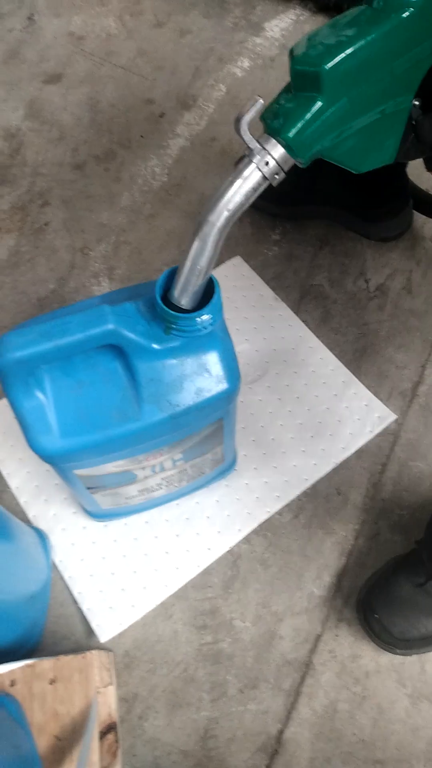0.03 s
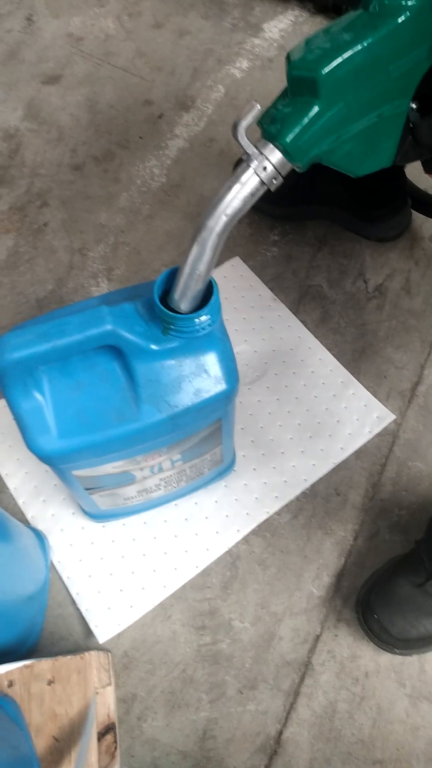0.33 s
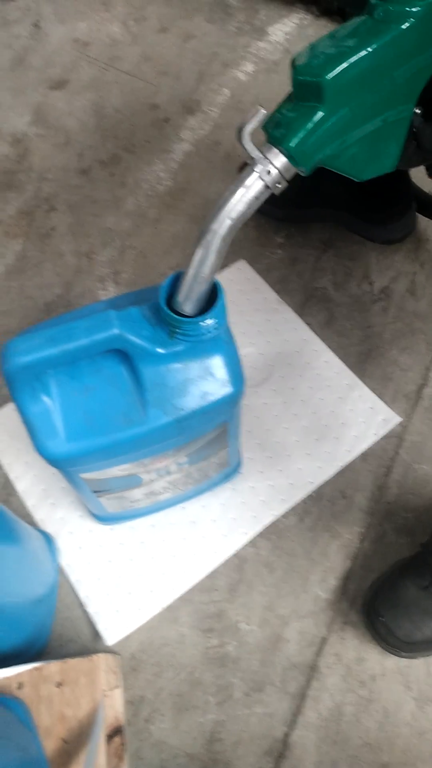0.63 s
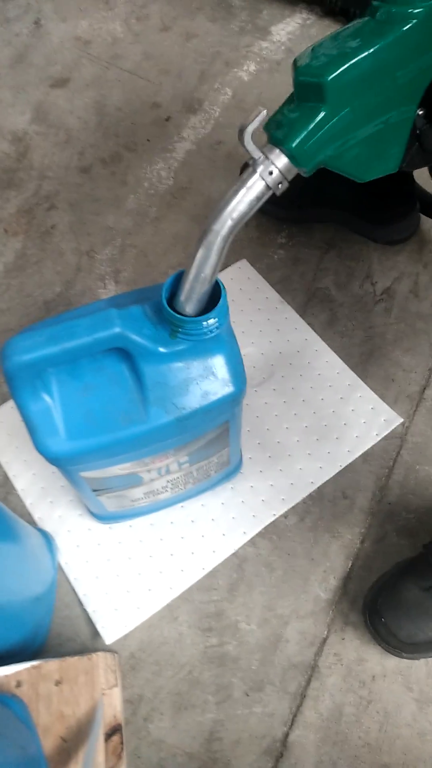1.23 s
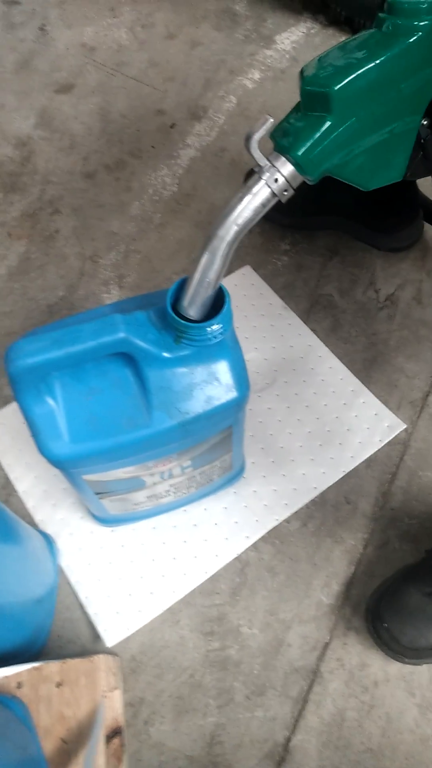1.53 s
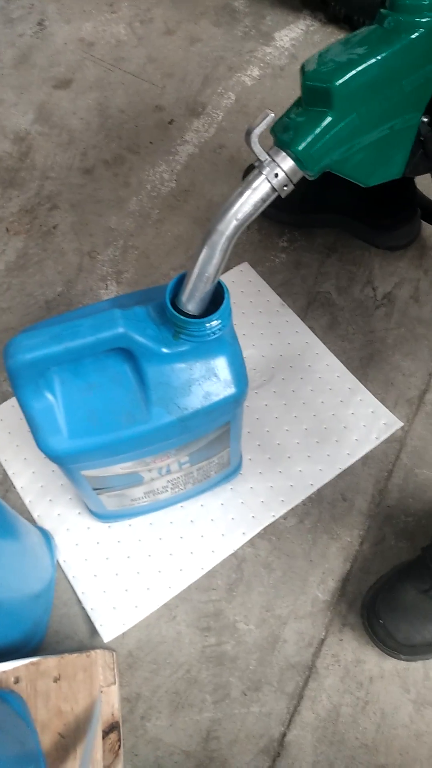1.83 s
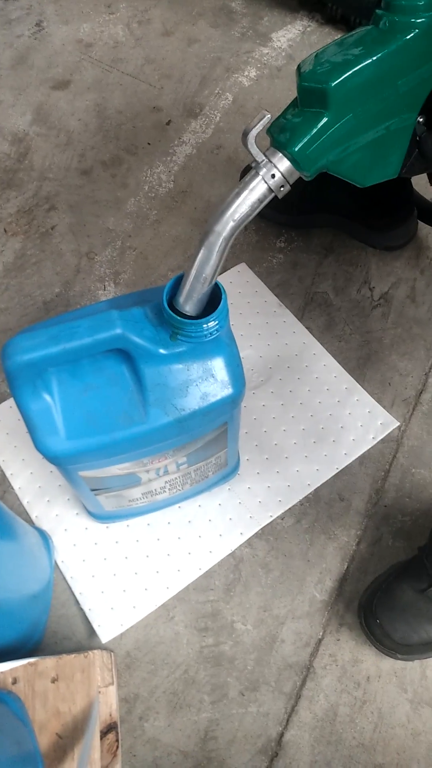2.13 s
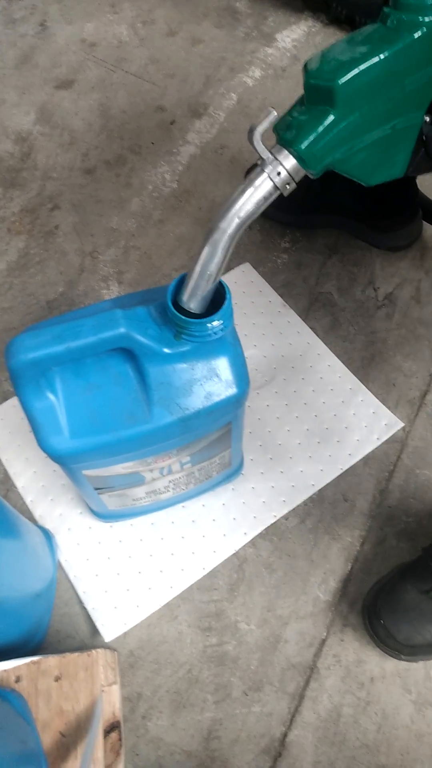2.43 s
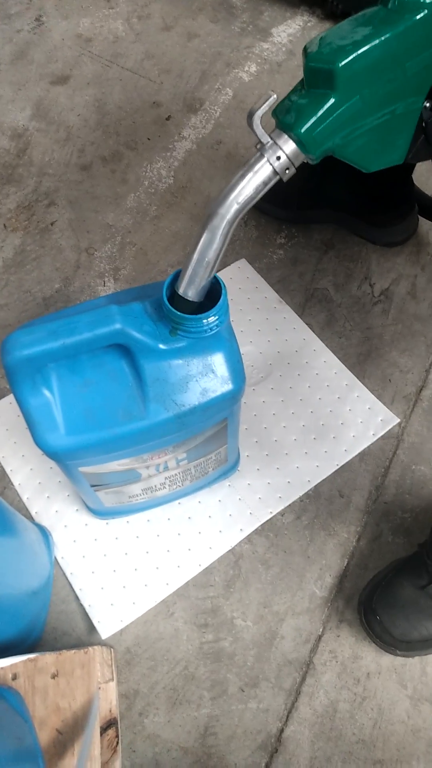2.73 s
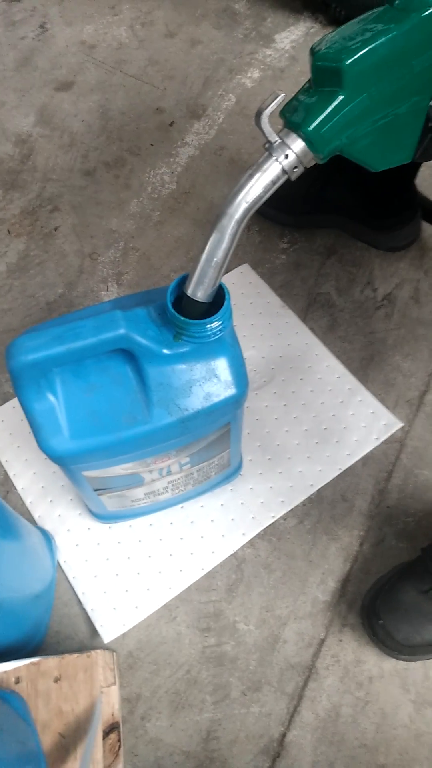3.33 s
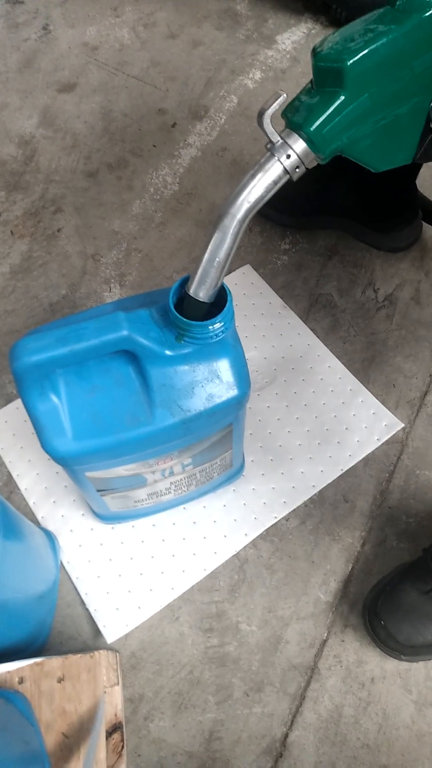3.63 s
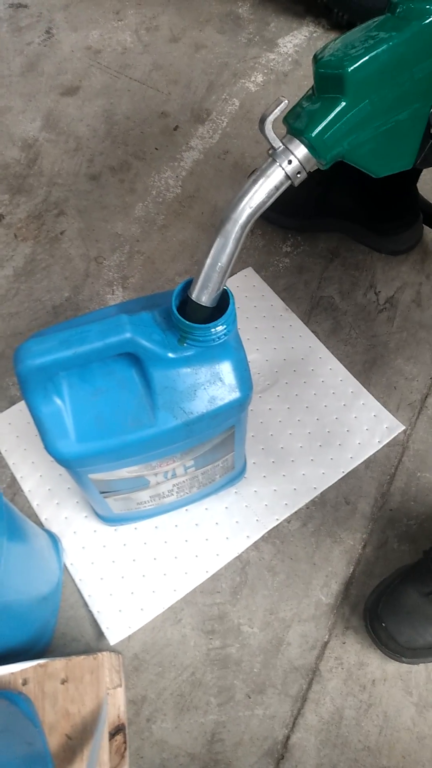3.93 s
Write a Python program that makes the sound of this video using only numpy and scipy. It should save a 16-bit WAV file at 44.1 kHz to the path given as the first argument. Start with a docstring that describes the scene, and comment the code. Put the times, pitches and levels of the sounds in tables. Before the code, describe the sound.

An air-driven oil pump lets out four sharp puffs of exhaust, each with a small valve squeak and clack. Leaking air hisses and whistles thinly between them, over a steady machine hum in a slightly echoing workshop.

```python
"""A workshop machine hums and throbs under the hiss and thin, high whistle of an air-driven oil pump.
Air leaks through the pump's passages on every piston stroke, and the whistle climbs with the pressure:
bright on the way up, lower and faint on the way down. At each of four turns the air valve squeaks,
clacks over and lets out a puff of exhaust, hiss on top of a low gust, that the room carries on."""
import sys
import numpy as np
from scipy import signal
from scipy.fft import rfft, irfft
from scipy.io import wavfile

SR = 44100
rng = np.random.default_rng(int(sys.argv[2]) if len(sys.argv) > 2 else 0)


def log_audio(samples):
    """Write samples as a 16-bit WAV file to the path given in sys.argv[1]."""
    # one column per channel
    frames = np.atleast_2d(samples).T
    # limit to full scale, then quantise
    limited = np.clip(frames, -1, 1)
    pcm = np.round(limited * 32767).astype(np.int16)
    wavfile.write(sys.argv[1], SR, pcm)


N = 176400
T = np.arange(N) / SR
HZ = np.fft.rfftfreq(N, 1 / SR)

# machine hum partials: multiple of HUM_HZ, level/dB relative to HUM_DB
HUM_PARTIALS = [(2, -7.5), (3, -0.5), (4, -1), (5, -1.5), (6, 1)]
HUM_HZ, HUM_DB, HUM_WAVER_DB, HUM_DRIFT_HZ, THROB_DEPTH = 37.02, -47.5, 3, 0.26, 0.35
# steady motor tones: f/Hz, level/dB
MOTOR_TONES = [(333.8, -51.5), (362, -58), (729, -67.5)]
# workshop rumble bed: f/Hz, level/dB per Hz
RUMBLE_SPECTRUM = [(20, -86), (35, -86), (55, -97), (75, -69.5), (105, -63), (170, -63.5), (245, -60.5),
                   (310, -70), (500, -75), (750, -77.5), (1100, -79.5), (1500, -80.5), (1950, -83),
                   (2200, -91), (4000, -100), (16000, -115)]

UP_STARTS_S, DOWN_STARTS_S = [-0.497, 1.333, 3.175], [0.425, 2.255]
PRESSURE_FROM_S, PRESSURE_RISE_S, STROKE_S = 0.24, 0.21, 0.88
# broad hiss of the leak: f/Hz, level/dB per Hz
LEAK_SPECTRUM = [(1500, -103), (2300, -88.5), (3600, -91.5), (4400, -84), (6200, -87), (7900, -82.5),
                 (9200, -85.5), (10200, -93), (11500, -105), (12800, -94), (13600, -106), (16000, -112)]
# air passage resonances: f/Hz, width/Hz, upstroke level/dB per Hz, downstroke level/dB per Hz
PASSAGE_RESONANCES = [(2992, 100, -74.5, -81.5), (4240, 100, -87, -80), (4980, 96, -75, -79),
                      (5560, 140, -75.5, -73), (6810, 160, -76.5, -73.5), (7440, 180, -70.5, -74),
                      (7860, 190, -66, -72), (8300, 100, -71.5, -88), (8750, 335, -68.5, -76),
                      (12070, 220, -76, -81.5), (12600, 190, -79, -89)]
# bright upstroke whistle: t/s into the stroke, f/Hz, level/dB
UP_WHISTLE_CURVE = [(0.249, 9750, -47), (.3, 10300, -40), (0.349, 10760, -33), (.41, 10920, -34.5),
                    (0.551, 11070, -28.5), (0.702, 11310, -31.5), (.828, 11370, -36), (.842, 12560, -33),
                    (.853, 11900, -48), (0.864, 10000, -38), (0.891, 9100, -31)]
# faint downstroke whistle: t/s into the stroke, f/Hz, level/dB
DOWN_WHISTLE_CURVE = [(.29, 5300, -51), (.35, 5660, -51.5), (.4, 5860, -51.5), (.51, 6060, -57),
                      (.7, 6220, -57), (.76, 6240, -48.5), (.825, 6310, -42), (.84, 6400, -55)]
FLUTTER_DB, JITTER_HZ, BREAK_S, BREAK_JITTER_HZ = 1.5, 30.8, 0.832, 330

# squeaks of the shifting valve: t/s, length/s, start f/Hz, top f/Hz, level/dB
VALVE_SQUEAKS = [(0.36, 0.024, 5420, 5600, -34), (.372, 0.011, 8100, 8150, -24),
                 (.406, 0.016, 5380, 5600, -26), (1.269, 0.016, 6500, 7870, -23.5),
                 (1.294, 0.02, 6980, 8900, -19.5), (2.199, 0.015, 7940, 8100, -22.5),
                 (2.228, 0.021, 5490, 5680, -27.5), (3.113, 0.016, 6500, 8000, -22.5),
                 (3.139, 0.02, 7200, 8950, -21)]
SQUEAK_PEAK_SHARE, SQUEAK_BEND, SQUEAK_JITTER_HZ = 0.82, 3.18, 160
# air slipping past the valve before it turns over: f/Hz, level/dB per Hz
SLIP_SPECTRUM = [(2500, -88), (4700, -76.5), (5600, -63.5), (6400, -72), (8000, -63.5), (9100, -72),
                 (10300, -90), (12800, -75), (14000, -88), (16000, -81)]
SLIP_LEAD_S, SLIP_SPUTTER_DB = 0.06, 3
# mix of each turn: t/s, hiss gain/dB, clack gain/dB, ping level/dB, gust gain/dB, thump gain/dB
TURNS = [(.425, 2, -3, -23.5, 0.5, -5.5), (1.333, 2, -1.5, -27, 1, -0.5), (2.255, 1.5, -2, -21, 0, -11),
         (3.174, 2, -12, -43, 1.5, 0)]
# hiss of the exhaust jet: f/Hz, level/dB per Hz
JET_SPECTRUM = [(500, -94), (1900, -72.5), (2230, -79.5), (2600, -72), (3000, -67), (3600, -65.5),
                (4400, -62.5), (5200, -64), (6200, -61), (7300, -59.5), (8700, -57), (10200, -62),
                (11800, -62.5), (13500, -61.5), (15500, -68)]
OPEN_S, HOLD_S, EMPTY_S, JET_SPUTTER_DB = 0.04, 0.071, 0.056, 1.07
# housing resonances that each puff rings: f/Hz, width/Hz, level/dB per Hz, fall/s
HOUSING_RINGS = [(1890, 56, -68, 0.22), (2830, 150, -71, 0.14)]
# metal modes of the air valve: f/Hz, level/dB, t60/s
VALVE_MODES = [(4680, -30, .03), (5440, -44, 0.024), (9050, -28, .05), (12500, -21, 0.042)]
CLACK_S, SPIT_DB, PING_HZ, PING_S = 0.0088, 4, 3090, 0.0034
# turbulent low body of the jet: f/Hz, level/dB per Hz
GUST_SPECTRUM = [(25, -82), (65, -67), (140, -56.5), (300, -64), (500, -61.5), (750, -63), (1200, -65.5),
                 (1900, -74.5), (2600, -70.5), (6000, -100)]
THUMP_AFTER_S, THUMP_WIDTH_S, THUMP_DB = 0.093, 0.0015, -15.5

# likeness of left and right in the rumble and the reverb: f/Hz, coherence/0-1
COHERENCE = [(60, 0.81), (120, 1), (220, 0.84), (350, 0.8), (500, 0.66), (750, 0.22), (1300, 0)]
# stereo balance of the pump: f/Hz, left minus right level/dB
BALANCE = [(300, -1), (700, 0.7), (1300, -5), (2250, -4.5), (3000, -13), (4400, -11), (5300, -3.5),
           (6200, -8.5), (7100, -6.5), (7900, 14), (8900, -1.5), (10200, 2), (11500, 2.5), (15500, 6)]
# stereo phase of the pump's direct sound: f/Hz, left lead/rad
PHASE_LEAD = [(50, 0), (300, 0.6), (700, -1.43), (1900, -1.93), (2300, -2.5), (4400, -3), (6200, -5.5),
              (7300, -4), (8700, -1.77), (10200, -2.5), (11800, -1.5), (15500, -8.5)]
# workshop reverb: f/Hz, t60/s
REVERB_TIMES = [(150, 0.37), (1000, 0.78), (3000, 0.89), (6000, 0.77), (9000, 0.61), (14000, .5)]
LOWPASS_HZ = 15850


def amp(db):
    """Decibels to gain."""
    return 10 ** (np.asarray(db) / 20)


def read(points, hz):
    """A table read on a log-frequency axis."""
    f, value = np.transpose(points)
    return np.interp(np.log(hz + 1), np.log(f + 1), value)


def noise(db):
    """Noise with the given level per Hz."""
    return irfft(rfft(rng.standard_normal(N)) * amp(db), N) * np.sqrt(SR / 2)


def band(hz, width):
    """Noise in one resonance, 0 dB per Hz at its top."""
    return noise(-20 * np.log10(1 + ((HZ - hz) / width) ** 2))


def wander(seconds):
    """A smooth random modulator of unit size that moves over the given time."""
    x = irfft(rfft(rng.standard_normal(N)) / (1 + (HZ * seconds) ** 2) ** 2, N)
    return (x - x.mean()) / x.std()


def tone(hz):
    """A sine of unit power that follows a pitch curve."""
    return np.sqrt(2) * np.sin(2 * np.pi * (np.cumsum(hz * np.ones(N)) / SR + rng.random()))


def burst(start, rise, hold, fall, jump=0):
    """An envelope that opens at jump, swells to 1 and dies away from hold seconds after its start."""
    t = T - start
    attack = (t > 0) * (jump + (1 - jump) * np.clip(t / rise, 0, 1))
    return attack * np.exp(-np.maximum(t - hold, 0) / fall)


def spread(left, other, hz):
    """Two unrelated spectra become a stereo pair, narrow in the bass and wide in the treble."""
    same = np.clip(read(COHERENCE, hz), 0, 1)
    return np.array([left, same * left + np.sqrt(1 - same ** 2) * other])


def machine_hum():
    """The bed: a running machine hums, and the low end of its rumble throbs at the same rate."""
    speed = HUM_HZ + HUM_DRIFT_HZ * wander(0.18)
    hum = sum(amp(HUM_DB + db + HUM_WAVER_DB * wander(0.12)) * tone(round(multiple) * speed)
              for multiple, db in HUM_PARTIALS)
    hum += sum(amp(db) * tone(hz + 0.78 * wander(0.17)) for hz, db in MOTOR_TONES)
    rumble_db = read(RUMBLE_SPECTRUM, HZ)
    rumble = spread(rfft(noise(rumble_db)), rfft(noise(rumble_db)), HZ)
    bass = irfft(rumble / (1 + (HZ / 400) ** 4), N)
    return hum + irfft(rumble, N) + THROB_DEPTH * tone(speed) * bass


def leak():
    """Air hisses through the pump's resonant passages as pressure builds in each stroke."""
    hold = STROKE_S - PRESSURE_FROM_S
    up, down = (sum(burst(start + PRESSURE_FROM_S, PRESSURE_RISE_S, hold, CLACK_S) for start in starts)
                for starts in (UP_STARTS_S, DOWN_STARTS_S))
    out = noise(read(LEAK_SPECTRUM, HZ)) * (amp(0.5) * up + down)
    for hz, width, up_db, down_db in PASSAGE_RESONANCES:
        out += band(hz, width) * (amp(up_db) * up + amp(down_db) * down)
    return out


def whistles():
    """A whistle climbs with the pressure in every stroke and turns ragged at its end."""
    out = np.zeros(N)
    for starts, curve in ((UP_STARTS_S, UP_WHISTLE_CURVE), (DOWN_STARTS_S, DOWN_WHISTLE_CURVE)):
        times, hz, db = np.transpose(curve)
        for start in starts:
            t = T - start
            level = np.interp(t, times, amp(db), left=0, right=0)
            flutter = amp(FLUTTER_DB * wander(0.036))
            pitch = np.interp(t, times, hz) + JITTER_HZ * wander(0.0034)
            rasp = (t > BREAK_S) * BREAK_JITTER_HZ * wander(0.00044)
            out += level * flutter * tone(pitch + rasp)
    return out


def valve_squeaks():
    """Short rising chirps as the valve starts to move."""
    out = np.zeros(N)
    jitter = SQUEAK_JITTER_HZ * wander(0.00078)
    for start, length, from_hz, top_hz, db in VALVE_SQUEAKS:
        progress = np.clip((T - start) / length, 0, 1)
        envelope = np.interp(progress, [0, SQUEAK_PEAK_SHARE, 1], [0, 1, 0])
        pitch = top_hz + (from_hz - top_hz) * (1 - progress) ** SQUEAK_BEND
        out += amp(db) * envelope * tone(pitch + jitter)
    return out


def exhaust():
    """Air slips past the valve, then the cylinder empties and sets the housing ringing."""
    jet, slip, ring = np.zeros((3, N))
    for start, hiss_db, *_ in TURNS:
        jet += amp(hiss_db) * burst(start, OPEN_S, HOLD_S, EMPTY_S, jump=0.8)
        slip += burst(start - SLIP_LEAD_S, rise=0.036, hold=SLIP_LEAD_S, fall=CLACK_S)
    for hz, width, db, fall in HOUSING_RINGS:
        envelope = sum(burst(start, OPEN_S, HOLD_S, fall) for start, *_ in TURNS)
        ring += amp(db) * band(hz, width) * envelope
    jet_hiss = amp(JET_SPUTTER_DB * wander(0.0027)) * jet * noise(read(JET_SPECTRUM, HZ))
    slip_hiss = amp(SLIP_SPUTTER_DB * wander(0.005)) * slip * noise(read(SLIP_SPECTRUM, HZ))
    return jet_hiss + slip_hiss + ring


def valve_clacks():
    """The valve clacks over with a spit of air and a short metallic ping."""
    out = np.zeros(N)
    spit = noise(read(JET_SPECTRUM, HZ))
    for start, _, clack_db, ping_db, _, _ in TURNS:
        out += amp(clack_db + SPIT_DB) * spit * burst(start, 0.002, CLACK_S, CLACK_S / 2)
        out += amp(ping_db) * tone(PING_HZ) * burst(start, 0.0016, PING_S, PING_S)
        for hz, db, t60 in VALVE_MODES:
            out += amp(db + clack_db) * tone(hz) * burst(start, 0.001, CLACK_S / 2, t60 / np.log(1000))
    return out


def gust():
    """Low turbulence builds behind each puff and gives it weight, with one soft thump near its end."""
    swell, thump = np.zeros((2, N))
    for start, *_, gust_db, thump_db in TURNS:
        swell += amp(gust_db) * burst(start, rise=0.08, hold=0.122, fall=0.015, jump=0.34)
        offset = (T - start - THUMP_AFTER_S) / THUMP_WIDTH_S
        thump -= amp(THUMP_DB + thump_db) * (1 - offset ** 2) * np.exp(-offset ** 2 / 2)
    return swell * noise(read(GUST_SPECTRUM, HZ)) + thump


def room(x, wet, left_db=0, tails=4):
    """Stereo direct sound plus a slowly changing diffuse tail; wet is the tail's share of power."""
    size = N + SR
    hz, tail = np.fft.rfftfreq(size, 1 / SR), 0
    for k in range(tails):
        f, t, grains = signal.stft(rng.standard_normal((2, SR)), SR, nperseg=256)
        t60 = read(REVERB_TIMES, f)[:, None]
        decay = np.exp(-np.log(1000) * t / t60) * np.sqrt(2 * np.log(1000) / (t60 * SR))  # unit energy
        response = signal.istft(grains * decay, SR, nperseg=256)[1]
        crossfade = np.sqrt(np.interp(T, np.linspace(0, T[-1], tails), np.eye(tails)[k]))
        tail = tail + rfft(x * crossfade, size) * rfft(response, size)
    direct = rfft(x, size) * np.exp(0.5j * np.outer([1, -1], read(PHASE_LEAD, hz)))
    mix = np.sqrt(1 - wet) * direct + np.sqrt(wet) * spread(*tail, hz)
    pan = amp(np.outer([0.5, -0.5], read(BALANCE, hz) + left_db))
    return irfft(mix * pan / np.sqrt((pan ** 2).mean(0)), size)[:, :N]


def scene():
    """The pump's turns and strokes in the room, over the bed of hum."""
    puffs = room(exhaust(), wet=0.54) + room(gust(), wet=0.14)
    valve = room(valve_clacks() + valve_squeaks(), wet=0.32)
    strokes = room(leak(), wet=0.33, left_db=-0.5) + room(whistles(), wet=0.17, left_db=3.5)
    return puffs + valve + strokes + machine_hum()


def record(dry):
    """A steep low-pass trims the very top of the mix."""
    lowpass = signal.firwin(511, LOWPASS_HZ, window=("kaiser", 9), fs=SR)
    return signal.oaconvolve(dry, lowpass[None], "same")


dry = scene()
out = record(dry)
log_audio(out)
```